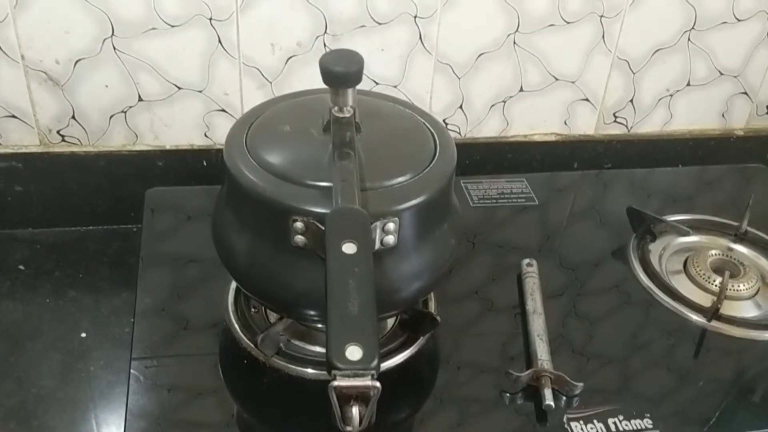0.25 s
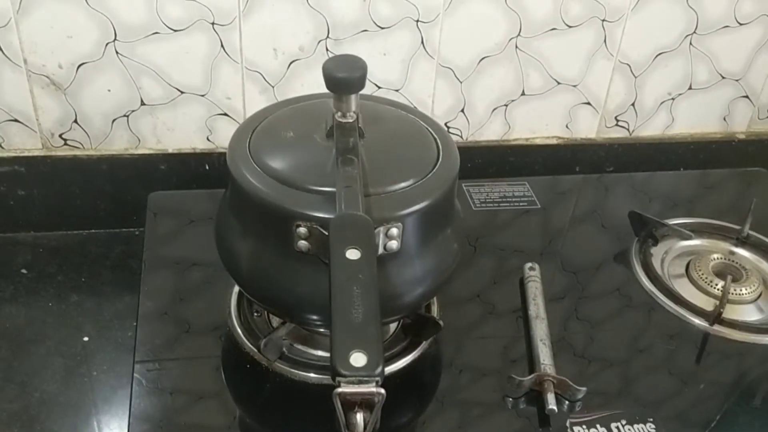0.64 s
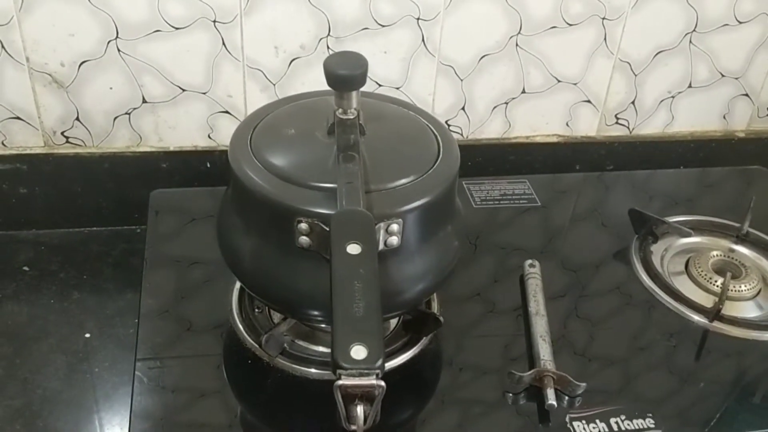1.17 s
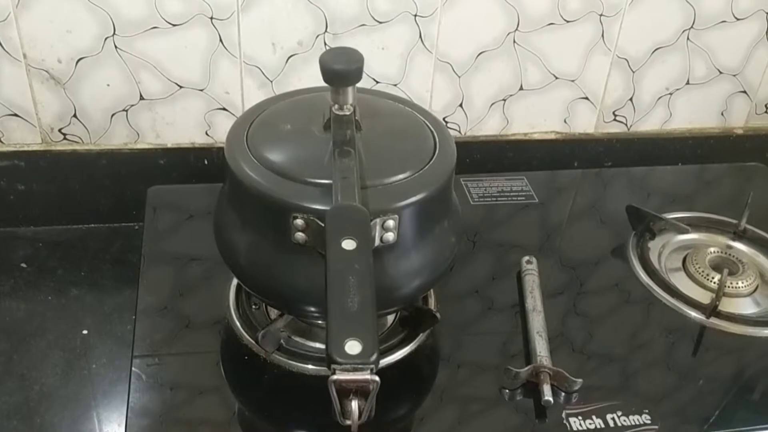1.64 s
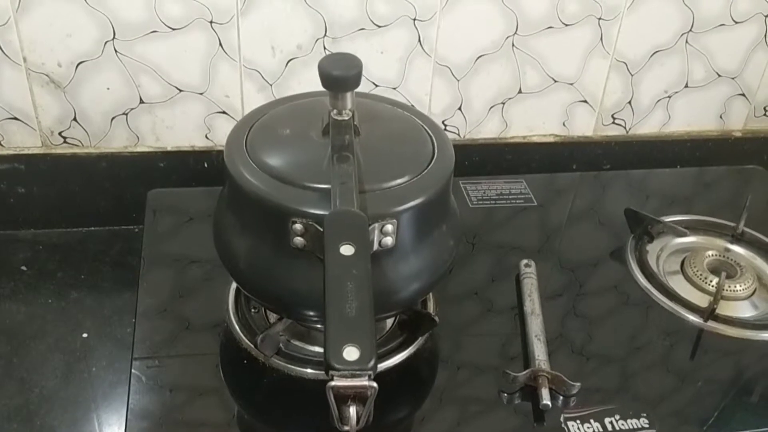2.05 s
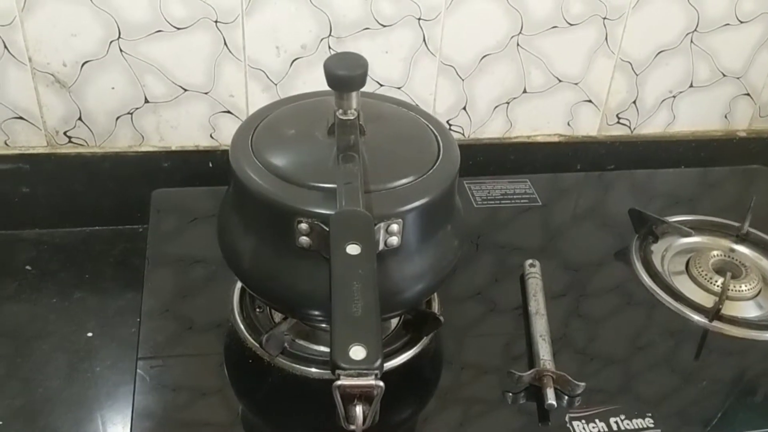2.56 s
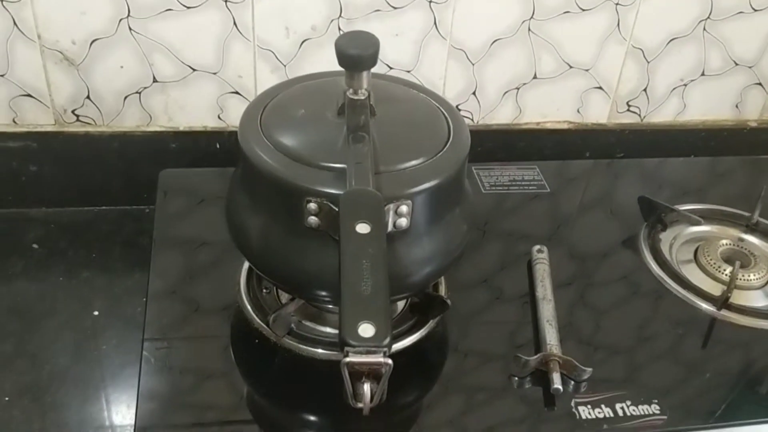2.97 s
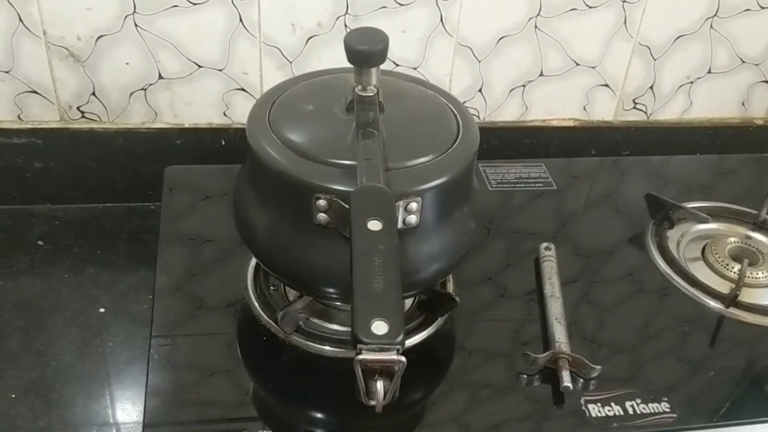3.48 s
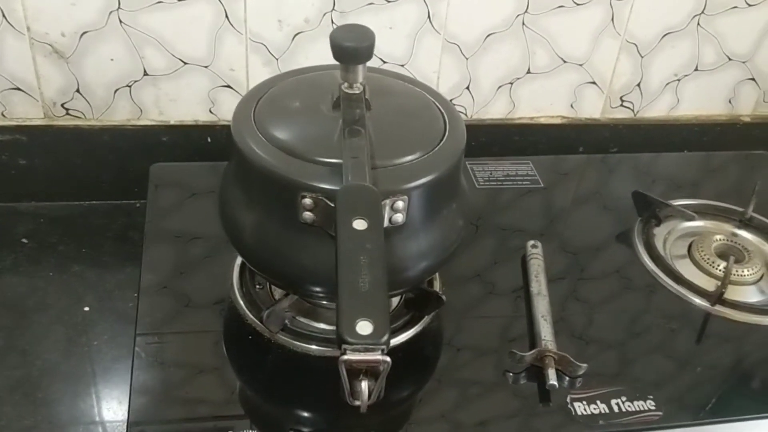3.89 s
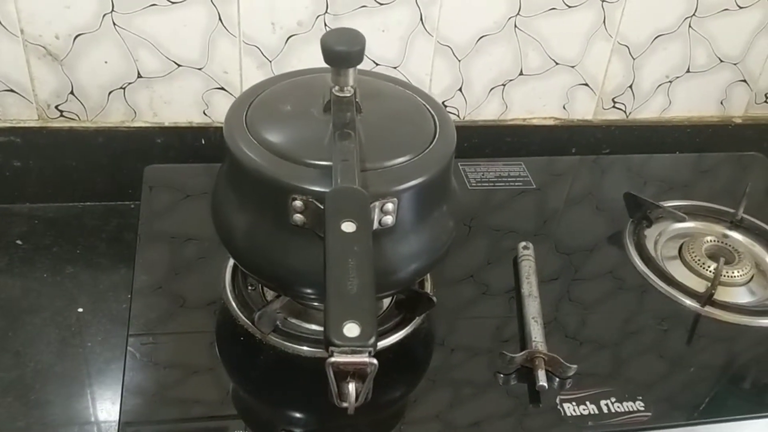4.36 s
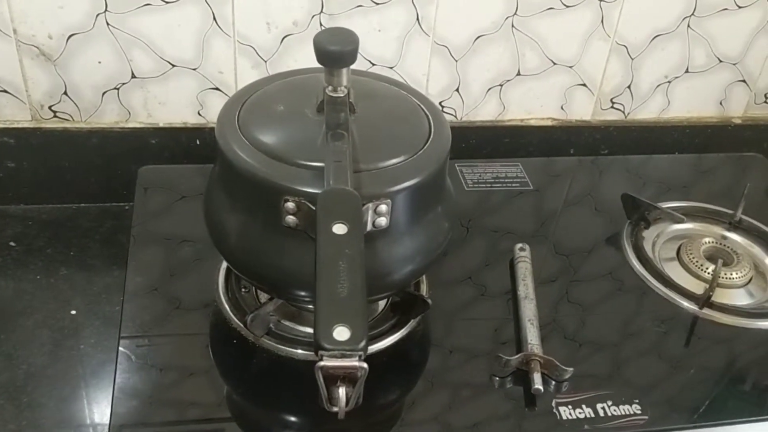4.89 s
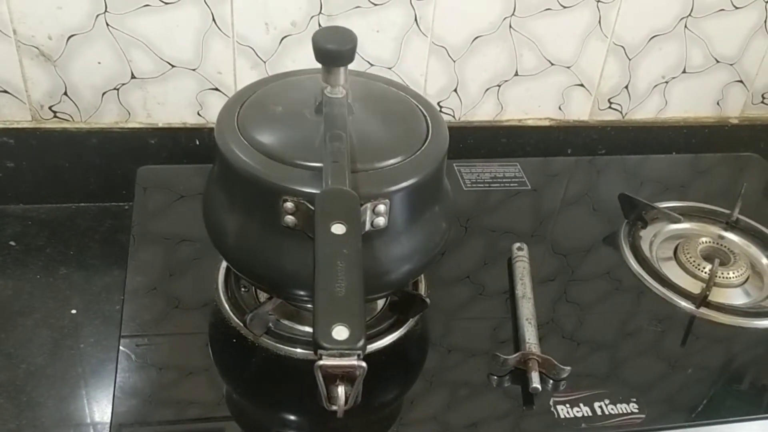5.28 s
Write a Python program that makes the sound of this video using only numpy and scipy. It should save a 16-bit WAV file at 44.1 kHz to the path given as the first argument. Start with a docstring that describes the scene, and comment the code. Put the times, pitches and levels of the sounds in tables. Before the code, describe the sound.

In a tiled kitchen, a pressure cooker on a gas burner gives a sharp tiny puff with a soft low thud, then steam escapes in two quick steps into a loud continuous hiss. Breathy whistle tones flicker in and out, fizzing with spray, while flame noise and a faint low hum lie beneath. Close handheld stereo microphone, wide treble, short hard reflections.

```python
"""Steam hisses from the weight valve of a pressure cooker on a gas burner in a tiled kitchen.
After one spit the jet opens in two steps and slowly gains force: shaped noise, patchy in the treble,
with fizzing bursts for spray. Valve cavities (narrow noise bands) catch and lose a breathy whistle.
Room reflections colour the hiss with narrow steady peaks; flame noise, a wavering hum and room
resonances lie underneath."""
import sys
import numpy as np
from scipy import signal
from scipy.fft import rfft, irfft
from scipy.io import wavfile
from scipy.ndimage import uniform_filter1d

SR = 44100
rng = np.random.default_rng(int(sys.argv[2]) if len(sys.argv) > 2 else 0)


def materialize(psi):
    """Save the field psi as 16-bit PCM at rate SR to the path in sys.argv[1].

    A 1-D psi becomes a single channel; in a 2-D psi each row is a channel.
    """
    bounded = np.clip(np.atleast_2d(psi).T, -1, 1)
    quanta = np.round(bounded * 32767).astype(np.int16)
    wavfile.write(sys.argv[1], SR, quanta)


N = 244124
TIME_S, BIN_HZ = np.arange(N) / SR, np.fft.rfftfreq(N, 1 / SR)

# Spectrum of flame and simmering pot. Each row: frequency in Hz, relative density in dB per Hz.
FLAME_SPECTRUM = [(20, -15), (60, -22), (105, -4), (200, -4), (270, -1), (380, -3), (520, -2.5),
                  (800, -8.5), (1300, -9), (4000, -13.5), (13000, -51.5)]
# Low kitchen resonances that grow with the steam flow.
# Each row: frequency in Hz, half-width in Hz, level in dB at rms flow.
ROOM_BOOMS = [(127, 13.5, -58), (190, 4.5, -66), (249.1, 7.4, -60.5), (270, 6.2, -62)]
# Swells of the low hum, added to its faint steady amplitude.
# Each row: centre in seconds, length in seconds, peak level in dB.
HUM_SWELLS = [(1.33, 0.234, -50.5), (1.58, 0.34, -49), (2.3, 0.22, -53), (2.63, 0.205, -53.5),
              (2.92, 0.15, -53), (3.33, 0.43, -51.5), (4.42, 0.53, -52.5), (5.0, 0.38, -55)]
# Narrow steady peaks in the hiss, coloured by room reflections.
# Each row: frequency in Hz, half-width in Hz, relative level in dB.
REFLECTION_PEAKS = [(1540, 23, -2), (2423, 31.2, 2), (2680, 14, -6.5), (3054, 19, -8), (3741, 55, 2),
                    (3978, 53, 3.5), (4135, 81, -0.5), (6200, 27, -10), (6840, 13, -7), (7450, 25, 6),
                    (8670, 25, 4)]
# Moments when the whistle catches.
# Each row: centre in seconds, pitch in Hz, length in seconds, level in dB before a common trim.
WHISTLE_CATCHES = [(0.03, 7300, 0.039, -43), (.21, 7150, 0.068, -36.5), (.323, 9140, 0.077, -29.5),
                   (0.572, 7400, .09, -27.5), (0.628, 6800, .098, -32.5), (1.053, 8950, .06, -29.5),
                   (1.26, 6650, .089, -30), (1.59, 7280, 0.106, -26), (1.756, 8130, .07, -29),
                   (2.067, 7430, 0.114, -29.5), (2.704, 6300, 0.066, -31), (3.443, 6500, 0.099, -28),
                   (3.68, 7300, .067, -27.5), (3.8, 7410, .06, -28.5), (3.85, 6450, .07, -26.5),
                   (4.358, 6400, 0.075, -25), (4.676, 6460, .12, -29.5), (4.843, 6200, 0.13, -29),
                   (5.247, 9200, .07, -27), (5.515, 6450, .05, -28)]
# Resonances of valve and vent pipe. Each row: frequency in Hz, half-width in Hz, relative level in dB.
VALVE_MODES = [(5280, 130, -15), (6210, 80, -6), (6470, 55, -4.5), (6760, 140, -5), (7360, 100, -3.5),
               (8920, 110, -6.5), (11100, 150, -10)]
# Spectrum of the free jet. Each row: frequency in Hz, relative density in dB per Hz.
JET_SPECTRUM = [(20, -10.5), (300, -12.5), (900, -11.5), (2000, -9.5), (3400, -9), (4100, -6.5),
                (4800, -5.5), (6200, 0.77), (7400, 1.5), (8000, -1), (9300, 1.76), (11000, -1.55),
                (12000, -7.5), (13000, -12.5)]
# Lifts of the weight: two quick steps, then two small creeps.
# Each row: centre in seconds, rise time in seconds, flow gain in dB.
WEIGHT_LIFTS = [(.183, .036, 10.1), (.29, .048, 7.9), (.47, .15, 1.8), (3.6, .2, .85)]
# Stereo likeness. Each row: frequency in Hz, left-right correlation (1 = identical).
STEREO_LIKENESS = [(4300, 0.74), (5600, 0.35), (6350, 0.36), (8000, 0.24), (10000, 0.27), (12500, 0.51)]

HUM_REST_DB = -62.5
LEAK_DB, AFTER_SPIT_DB, AFTER_SPIT_S = -45.3, 6.5, .028  # seated-weight leak; extra steam dying away
PUSH_FROM_S, PUSH_DB_PER_S = 3.65, 0.8
WHISTLE_DB, WHISTLE_DB_PER_S = -11, 0.3  # against the flow
MONO_BELOW_HZ, CUT_HZ = 4200, 13100


def amp(db):
    """Decibels to gain."""
    return 10 ** (np.asarray(db) / 20)


def unit(x):
    """Scales to rms 1."""
    return x / np.sqrt(np.mean(x ** 2) + 1e-20)


def across(points, hz):
    """Reads a table of frequency and value on a log-frequency axis."""
    point_hz, value = np.transpose(points)
    return np.interp(np.log(hz + 1), np.log(point_hz), value)


def wander(rate_hz):
    """Low-passed noise of rms 1, changing about rate_hz times a second."""
    noise = rfft(rng.standard_normal(N))
    return unit(irfft(noise * np.exp(-(BIN_HZ / rate_hz) ** 2), N))


def gusts(per_s, decay_s):
    """Random surges that start at once and decay exponentially; mean 0, rms 1."""
    kicks = (rng.random(N) < per_s / SR) * rng.exponential(1, N)
    surge = signal.lfilter([1], [1, -np.exp(-1 / (decay_s * SR))], kicks)
    return unit(surge - surge.mean())


def ringing(hz, half_width_hz):
    """Turbulence in one resonance: two unrelated narrow noise bands (mid, side), rms 1."""
    noise = rfft(rng.standard_normal((2, N)))
    return unit(irfft(noise / (1 + ((BIN_HZ - hz) / half_width_hz) ** 2), N))


def band_sum(bands):
    """Sum of unrelated noise bands at their table levels."""
    return sum(amp(db) * ringing(hz, half_width_hz) for hz, half_width_hz, db in bands)


def steam_flow():
    """Jet amplitude: leak, a step at each lift of the weight, then a slow push."""
    lifted_db = sum(db * np.clip((TIME_S - s) / rise_s + .5, 0, 1) for s, rise_s, db in WEIGHT_LIFTS)
    push_db = PUSH_DB_PER_S * np.maximum(TIME_S - PUSH_FROM_S, 0)
    after_spit_db = AFTER_SPIT_DB * np.exp(-TIME_S / AFTER_SPIT_S)
    return amp(LEAK_DB + after_spit_db + lifted_db + push_db)


def hum_level():
    """Hum amplitude: cosine arches over a faint steady level."""
    arches = 0
    for s, length_s, db in HUM_SWELLS:
        phase = np.clip((TIME_S - s) / length_s, -.5, .5)
        arches = arches + amp(db) * np.cos(np.pi * phase)
    return amp(HUM_REST_DB) + arches


def burner(flow, flame_db=-50, hum_hz=102, drift_hz=4, waver_db=3.0):
    """Flame roar, a hum wavering in level and pitch, and room resonances growing with the steam."""
    noise = rfft(rng.standard_normal((2, N)))
    flame = unit(irfft(noise * amp(across(FLAME_SPECTRUM, BIN_HZ)), N))
    booms = band_sum(ROOM_BOOMS)
    waver = amp(waver_db * wander(12))
    cycles = np.cumsum(hum_hz + drift_hz * wander(11.8)) / SR
    hum = unit(waver * np.sin(2 * np.pi * cycles))
    return amp(flame_db) * flame + np.sqrt(unit(flow)) * booms + hum_level() * hum


def reflection_peaks(flow, level_db=-19):
    """Narrow steady peaks in the hiss, coloured by room reflections: noise bands following the flow."""
    return amp(level_db) * flow * unit(band_sum(REFLECTION_PEAKS))


def spit(start_s=0.0061, puff_db=-24, puff_hz=8500, puff_half_width_hz=2400, puff_decay_s=.0022,
         thud_db=-43, thud_hz=270, thud_half_width_hz=60, thud_decay_s=0.0413):
    """The weight lets out one sharp puff and nudges the lid: two decaying noise bands."""
    age_s = np.maximum(TIME_S - start_s, 0)
    puff = amp(puff_db) * np.exp(-age_s / puff_decay_s) * ringing(puff_hz, puff_half_width_hz)
    thud = amp(thud_db) * np.exp(-age_s / thud_decay_s) * ringing(thud_hz, thud_half_width_hz)
    return (age_s > 0) * (puff + thud)


def spray(flow, per_s=420, level_db=-10, decay_s=0.00078):
    """Droplets torn through the gap: tiny decaying noise bursts of uneven size."""
    size_db = 3.3 * np.minimum(rng.exponential(1, N), 3.3)
    drops = (rng.random(N) < per_s / SR) * amp(size_db)
    bursts = signal.lfilter([1], [1, -np.exp(-1 / (decay_s * SR))], drops)
    fizz = rfft(bursts * rng.standard_normal((2, N)))
    colour = amp(across(JET_SPECTRUM, BIN_HZ)) * BIN_HZ / (BIN_HZ + 2500)  # jet colour, less bass
    return amp(level_db) * flow * unit(irfft(fizz * colour, N))


def catches(blur_hz=130, trim_db=-1):
    """Vortices lock briefly to one pitch: arched tones blurred by complex noise."""
    out = np.zeros((2, N))
    blur = np.array([wander(blur_hz) + 1j * wander(blur_hz) for channel in out])
    for s, hz, length_s, db in WHISTLE_CATCHES:
        now = abs(TIME_S - s) < length_s / 2
        swell = np.cos(np.pi * (TIME_S[now] - s) / length_s)
        carrier = np.exp(2j * np.pi * hz * TIME_S[now])
        out[:, now] += amp(db + trim_db) * swell * (blur[:, now] * carrier).real
    return out


def flares(per_s=6, length_s=.065, steady=.3):
    """Random short swells, soft-limited, over a weak steady drive."""
    kicks = (rng.random(N) < per_s / SR) * rng.uniform(0.49, 1, N)
    swells = signal.oaconvolve(kicks, signal.windows.hann(round(length_s * SR)), "same")
    return steady + np.tanh(swells)


def whistle(flow):
    """The jet crosses the rim of the weight; each cavity flares and fades by itself."""
    tones = 0
    for hz, half_width_hz, db in VALVE_MODES:
        tones = tones + amp(db) * flares() * ringing(hz, half_width_hz)
    return flow * amp(WHISTLE_DB + WHISTLE_DB_PER_S * TIME_S) * unit(tones)


def jet(flow, level_db=0.98, eddy_db=2.0, flutter_db=0.4, surge_db=0.24, size=512):
    """Turbulent hiss: shaped noise frames whose patches eddies brighten or dim for tens of ms."""
    hz, frames = np.fft.rfftfreq(size, 1 / SR), 4 * N // size + 5
    real, imaginary = rng.standard_normal((2, 2, frames, len(hz)))
    eddies = rng.standard_normal((frames, len(hz)))
    eddies = uniform_filter1d(eddies, size=11, axis=0)  # over time
    eddies = unit(uniform_filter1d(eddies, size=11, axis=1))  # over frequency
    patch_db = eddy_db * eddies * np.clip(hz / 5000, 0, 1)  # full depth above 5 kHz
    spectra = (real + 1j * imaginary) * amp(across(JET_SPECTRUM, hz) + patch_db)
    hiss = signal.istft(spectra.swapaxes(1, 2), nperseg=size, noverlap=size - size // 4)[1][:, :N]
    unsteady_db = flutter_db * wander(37) + surge_db * gusts(45, 0.005)
    return amp(level_db + unsteady_db) * flow * unit(hiss)


def tiles(x, count=30, echo_db=-13, span_s=.028):
    """Early echoes from lid, hob and tiled wall comb the hiss finely."""
    delay_s = rng.uniform(.002, span_s, count)
    sign = rng.choice([-1., 1.], count)
    taps = np.zeros(round(span_s * SR) + 1)
    taps[(delay_s * SR).astype(int)] = amp(echo_db) * sign / np.sqrt(count)
    taps[0] = 1  # direct sound
    return signal.oaconvolve(x, taps[None] / np.linalg.norm(taps), axes=1)[:, :N]


def pair(mid_side):
    """Left and right from unrelated mid and side: centred below, wide in the treble."""
    likeness = np.clip(across(STEREO_LIKENESS, BIN_HZ), -1, 1)
    likeness = np.where(BIN_HZ < MONO_BELOW_HZ, 1, likeness)
    gains = np.sqrt([(1 + likeness) / 2, (1 - likeness) / 2])
    mid, side = irfft(rfft(mid_side) * gains, N)
    return np.array([mid + side, mid - side])


def scene(centred_side_db=-10.0):
    """Wide hiss with echoes; whistle, spit and narrow peaks nearer the centre; burner beneath."""
    flow = steam_flow()
    hiss = tiles(jet(flow) + spray(flow))
    centred = whistle(flow) + catches() + reflection_peaks(flow) + spit()
    centred = centred * amp([[0], [centred_side_db]])  # narrows the image
    return pair(hiss + centred + burner(flow))


def record(dry):
    """Steep linear-phase low-pass at CUT_HZ."""
    lowpass = signal.firwin(1023, CUT_HZ, window=("kaiser", 9), fs=SR)
    return signal.oaconvolve(dry, lowpass[None], "same")


dry = scene()
out = record(dry)
materialize(out)
```